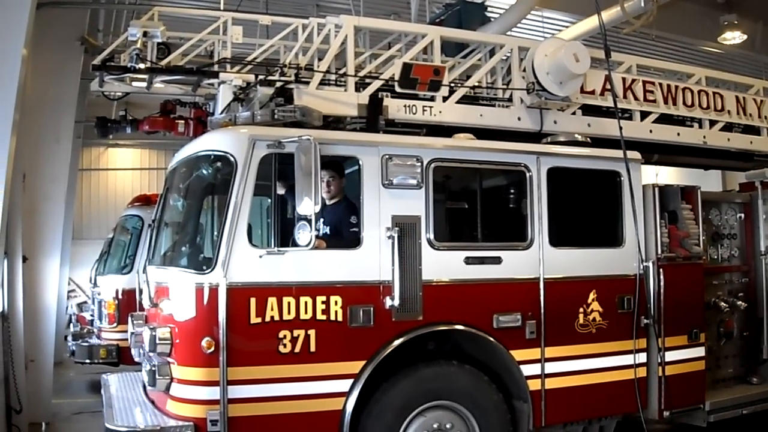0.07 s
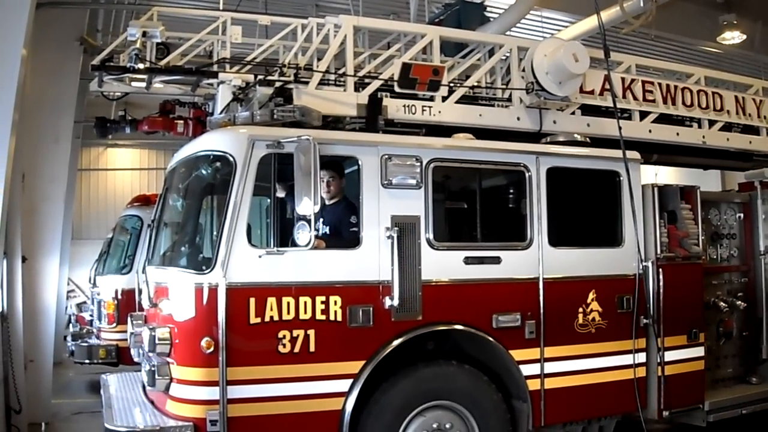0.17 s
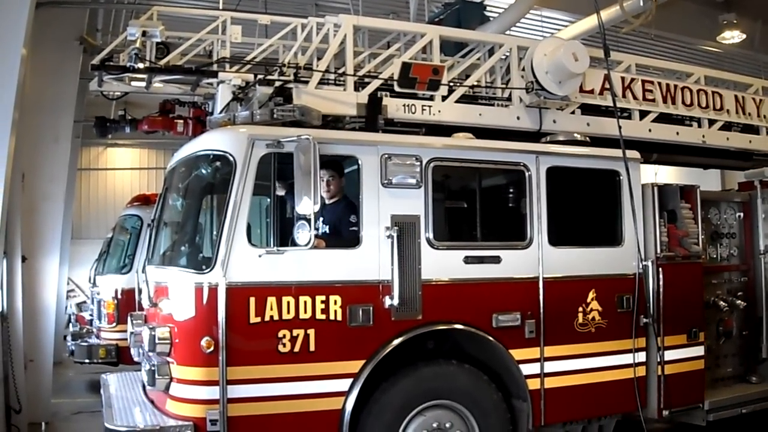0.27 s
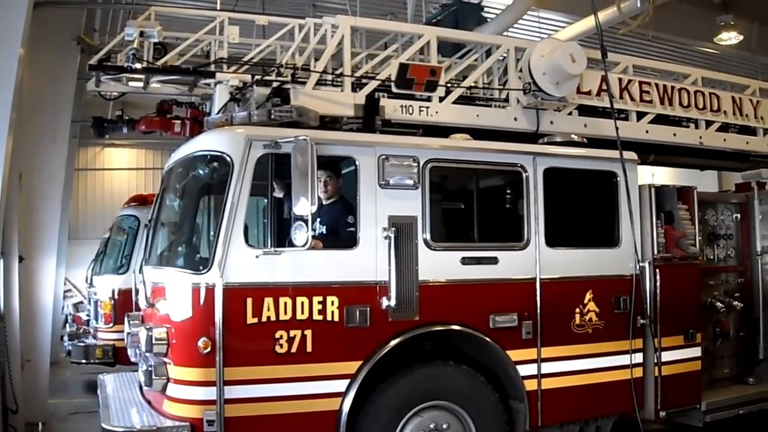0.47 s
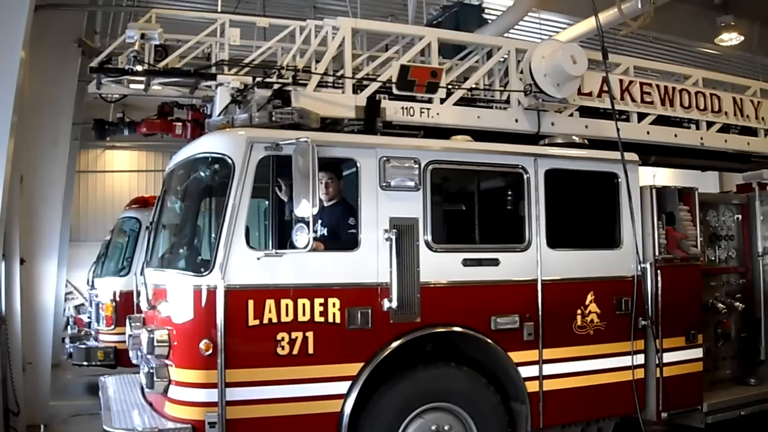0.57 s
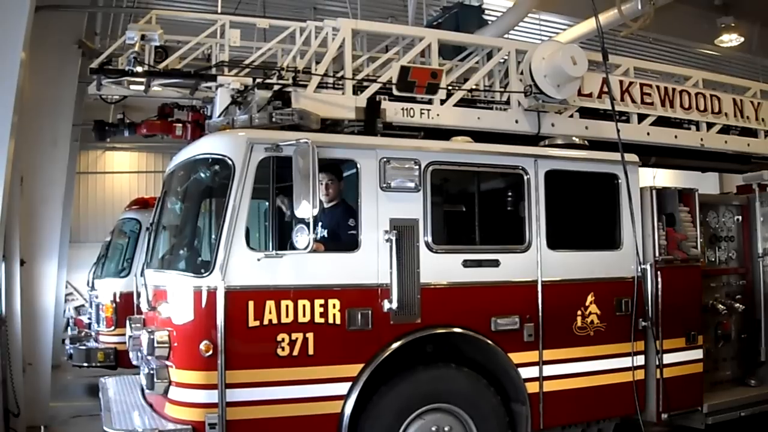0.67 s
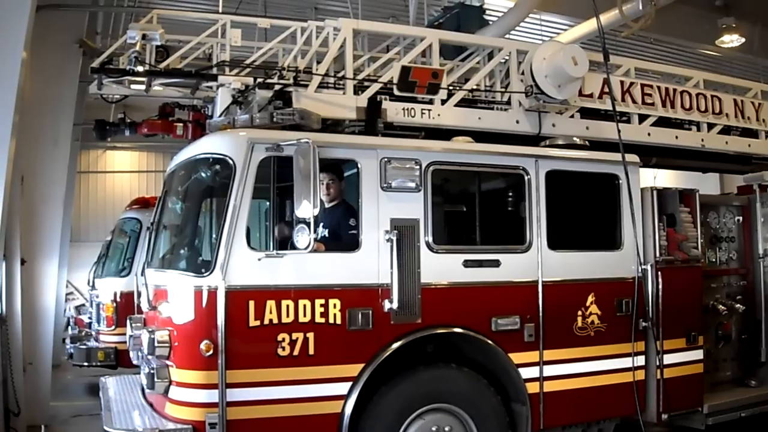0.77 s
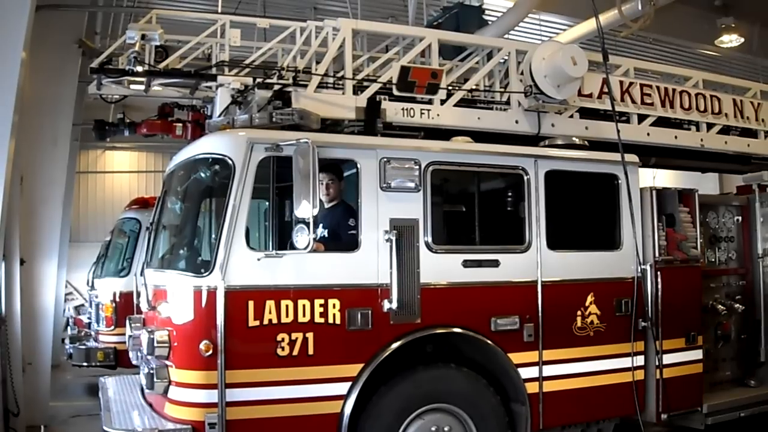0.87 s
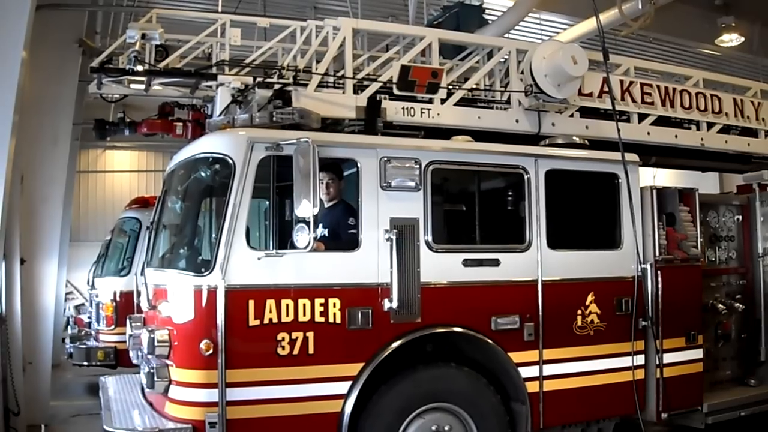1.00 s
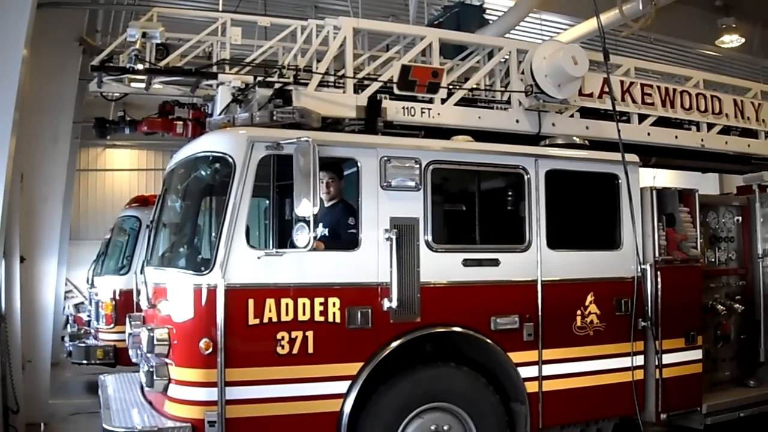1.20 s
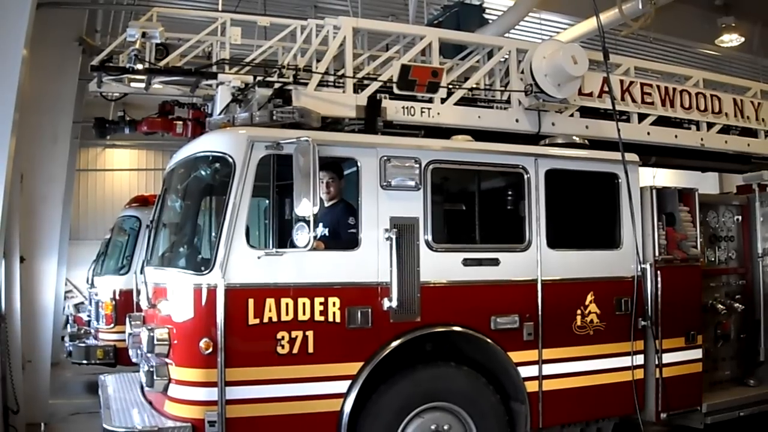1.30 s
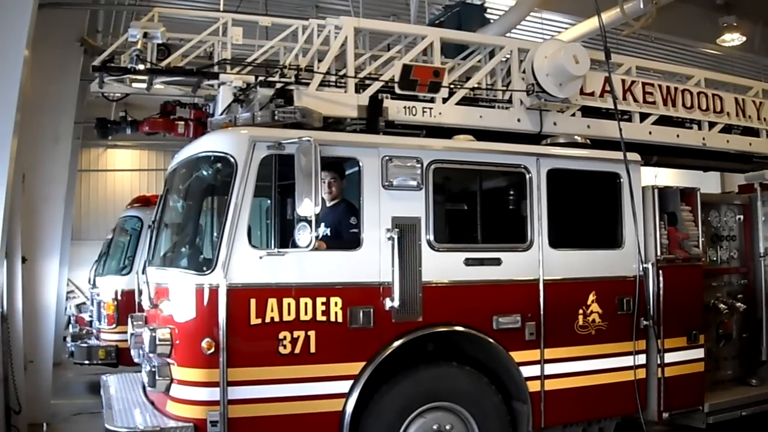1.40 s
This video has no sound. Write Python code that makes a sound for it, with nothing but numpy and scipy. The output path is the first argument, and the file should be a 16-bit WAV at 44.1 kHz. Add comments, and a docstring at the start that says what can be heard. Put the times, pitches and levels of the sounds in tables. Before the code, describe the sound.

A fire truck air horn gives one short, loud blast that echoes through a station bay.

```python
"""Fire truck air horns in a station bay

Twin horns give one short blast. The valve spits and the flared bells squeal, then both
diaphragms (thin metal discs) rattle in strong and weak beats with a rush of air. The hard-walled
bay rings on over steady machine noise, and the blast overloads the microphone."""
import sys
import numpy as np
from scipy import signal
from scipy.fft import rfft, irfft
from scipy.io import wavfile

SR = 44100
rng = np.random.default_rng(int(sys.argv[2]) if len(sys.argv) > 2 else 0)


def dump(signal):
    """Clip the signal to [-1, 1] and save it as 16-bit WAV at the path in sys.argv[1]."""
    limited = np.clip(np.atleast_2d(signal).T, -1, 1)
    pcm = np.round(limited * 32767).astype(np.int16)
    wavfile.write(sys.argv[1], SR, pcm)


N = 63945

# Air pressure at the horns, in two surges: time_s, level_db
PRESSURE = [(0.194, -68), (0.201, -16.5), (0.224, -4), (0.261, 3), (0.302, -1.5), (0.363, -4), (0.424, 0.5),
            (0.489, -2), (.555, -9), (.62, -21.5)]
# The two horns: pitch_hz, level_db, uneven_beat_db, jitter_share
HORNS = [(202.43, -10, -2, 0.00436), (207.48, -12, 4.5, 0.0069)]
# How the bells color the tone: frequency_hz, level_db
BELL_COLOR = [(100, -42), (205, -12), (305, -38), (410, -6.5), (510, -7), (610, -5), (725, 1.5),
              (820, -5.5), (930, -9), (1100, -4), (1220, -3), (1420, -2.5), (1530, -4), (1800, -3),
              (2000, -5), (2200, -0.5), (2600, -7), (3200, -7.5), (5000, -17.5), (8000, -27.5),
              (15000, -39)]
# The rush of air: frequency_hz, level_db
AIR_COLOR = [(100, -44), (350, -67), (700, 2.5), (1200, 0.5), (2200, -3), (4000, -7), (7000, -14.5),
             (15000, -31)]
JITTER_HZ, FLUTTER_HZ, FLUTTER_CYCLES = 65.3, 506, 0.01
SHARP_SHARE, SETTLE_S, SAG_SHARE = .025, 0.06005, .01
AIR_DB, AIR_PULSE_SHARE = -13, 0.94

def horns(t):
    """Two diaphragms beat unevenly into their bells; air escapes with every beat."""
    times, pressure_db = np.array(PRESSURE).T
    pressure = undb(np.interp(t, times, pressure_db)) * (t > times[0]) * (t < times[-1])
    # The pitch starts high and settles; it sags when the pressure is low.
    sharp = SHARP_SHARE * np.exp(-np.maximum(t - times[0], 0) / SETTLE_S)
    sag = SAG_SHARE * (1 - pressure)
    out = 0
    for pitch_hz, level_db, uneven_beat_db, jitter_share in HORNS:
        pitch = pitch_hz * (1 + sharp - sag + jitter_share * walk(JITTER_HZ))
        cycles = np.cumsum(pitch) / SR + FLUTTER_CYCLES * walk(FLUTTER_HZ)
        # Uneven beats add tones halfway between the usual overtones (the odd steps).
        steps = np.arange(2, 101)
        tones_hz = steps * pitch_hz / 2
        octaves_up = np.maximum(np.log2(tones_hz / 1080), 0)
        halfway_db = uneven_beat_db - 10.5 * octaves_up  # weaker above 1080 Hz
        gains = undb(read(BELL_COLOR, tones_hz) + halfway_db * (steps % 2))
        phases = rng.random(len(steps))
        tone = sum(gain * np.sin(2 * np.pi * (step * cycles / 2 + phase))
                   for step, gain, phase in zip(steps, gains, phases))
        air = noise(AIR_COLOR) * (1 + AIR_PULSE_SHARE * np.cos(2 * np.pi * cycles))
        out = out + undb(level_db) * unit(tone) + undb(AIR_DB) * air / 2
    return pressure * out


# One squeal for each surge of air: start_s, level_db, fade_multiplier
SQUEALS = [(0.195, 2, 1.4), (0.362, 4, .5)]
# The notes the bells ring at: pitch_hz, note_db, base_fade_s
BELL_NOTES = [(735, -10.5, 0.02), (930.4, -4.5, 0.042), (999.5, -5.5, 0.021), (1668, -8, 0.014)]

def bell_squeals(t, rise_s=0.016, waver_share=0.00995):
    """Each surge of air briefly sets the bells singing."""
    out = 0
    for start_s, level_db, fade_multiplier in SQUEALS:
        age = np.maximum(t - start_s, 0)
        rise = 1 - np.exp(-(age / rise_s) ** 2)
        for pitch_hz, note_db, base_fade_s in BELL_NOTES:
            pitch = pitch_hz * (1 + waver_share * walk(JITTER_HZ))
            cycles = np.cumsum(pitch) / SR
            fade = np.exp(-age / (fade_multiplier * base_fade_s))
            out = out + 2 * undb(level_db + note_db) * rise * fade * np.sin(2 * np.pi * cycles)
    return out


# The hiss of the valve: frequency_hz, level_db
SPIT_COLOR = [(200, -16), (1000, -1), (3000, 6), (6000, 5), (10000, -3), (15000, -12)]

def valve_spit(t, start_s=.2, rise_s=0.053, fade_s=0.068, gain_db=-10.5):
    """The valve lets out a short, bright spit of air as it opens."""
    age = np.maximum(t - start_s, 0)
    return undb(gain_db) * noise(SPIT_COLOR) * (1 - np.exp(-age / rise_s)) * np.exp(-age / fade_s)


# How long the bay's echo takes to fade by 60 dB: frequency_hz, ring_s
BAY_RING = [(100, 0.4), (205, 0.97), (400, 1.1), (600, 1.58), (725, 2.33), (850, 2.17), (1400, 2.21),
            (2500, 1.81), (4500, 1.43), (8000, 0.66), (15000, 0.31)]

def bay_echo(sound, t, delay_s=0.029, build_s=0.012):
    """Hard walls return dense echoes that build quickly and last longest in the middle pitches."""
    frequencies = np.fft.rfftfreq(N, 1 / SR)
    white = rfft(rng.standard_normal(N))
    age = np.maximum(t - delay_s, 0)
    centers_hz = [hz for hz, _ in BAY_RING]
    ring = 0
    for (_, ring_s), this_band in zip(BAY_RING, np.eye(len(centers_hz))):
        band = irfft(white * read(list(zip(centers_hz, this_band)), frequencies), N)
        ring = ring + band * np.exp(-np.log(1000) * age / ring_s)
    ring = ring * (1 - np.exp(-age / build_s))
    ring = ring / np.sqrt(np.sum(ring ** 2))
    return signal.fftconvolve(sound, ring)[:N] / 2


# The hiss of the machines: frequency_hz, level_db
MACHINE_COLOR = [(20, -8), (60, -4), (160, -5.5), (330, -1.5), (900, 1), (1400, -5.5), (2000, -8.5),
                 (2600, -4.5), (3300, -12.5), (4200, -17), (4950, -10.5), (6200, -25), (6750, -20),
                 (7200, -29), (7750, -18), (8600, -27.5), (10000, -27.5), (11500, -35.5), (15500, -41)]
# The hum of their motors: pitch_hz, level_db
MOTOR_HUM = [(30, -46), (60, -56.5)]

def machines(t, hiss_db=-36.5):
    """Machines in the station hiss steadily while their motors hum."""
    hiss = undb(hiss_db) * noise(MACHINE_COLOR)
    hum = sum(undb(db) * unit(np.sin(2 * np.pi * (hz * t + rng.random()))) for hz, db in MOTOR_HUM)
    return hiss + hum


def undb(db):
    """Turn decibels into a volume multiplier."""
    return 10 ** (np.asarray(db) / 20)


def unit(x):
    """Scale a sound to an average strength (rms) of 1."""
    return x / np.sqrt(np.mean(x ** 2))


def read(points, hz):
    """Look up a value between a table's frequencies, with octaves evenly spaced."""
    frequencies, values = np.array(points, float).T
    return np.interp(np.log(np.maximum(hz, 1)), np.log(frequencies), values)


def noise(color):
    """Noise of strength 1 with the given balance of low and high sounds."""
    gains = undb(read(color, np.fft.rfftfreq(N, 1 / SR)))
    return unit(irfft(rfft(rng.standard_normal(N)) * gains, N))


def walk(rate_hz):
    """A smooth random wobble of strength 1, mostly slower than rate_hz."""
    hz = np.fft.rfftfreq(N, 1 / SR)
    return unit(irfft(rfft(rng.standard_normal(N)) * (hz > 0) / (1 + (hz / rate_hz) ** 2), N))


def scene(direct_db=1.5, squeal_to_echo_db=-6):
    """Add up the blast, its echo and the machines in one channel."""
    t = np.arange(N) / SR
    blast = horns(t) + valve_spit(t)
    squeals = bell_squeals(t)
    echo = bay_echo(blast + undb(squeal_to_echo_db) * squeals, t)
    return (undb(direct_db) * (blast + squeals) + echo + machines(t))[None]


def record(dry, ceiling=0.56, hardness=33, top_hz=15800):
    """The overloaded microphone flattens the peaks; the highest treble is cut."""
    flattened = dry / (1 + np.abs(dry / ceiling) ** hardness) ** (1 / hardness)
    treble_cut = signal.ellip(10, .1, 80, top_hz, fs=SR, output="sos")
    return signal.sosfilt(treble_cut, flattened)


dry = scene()
out = record(dry)
dump(out)
```